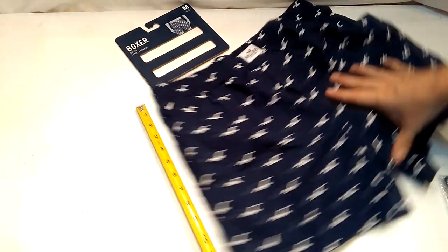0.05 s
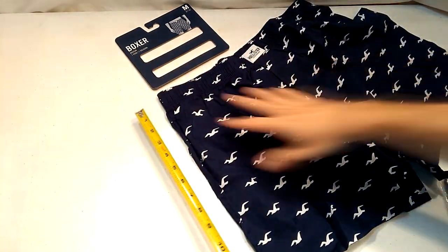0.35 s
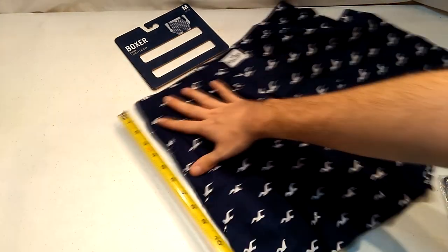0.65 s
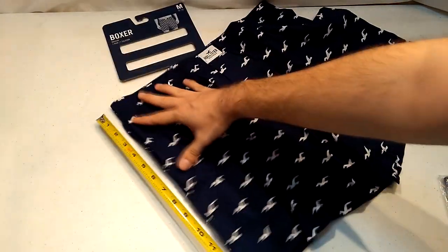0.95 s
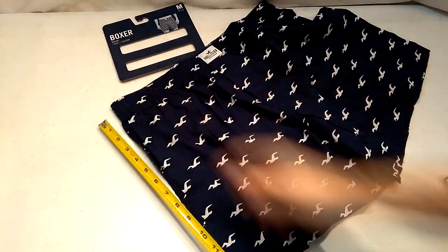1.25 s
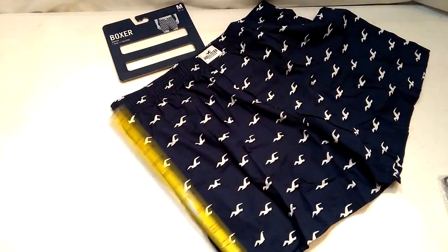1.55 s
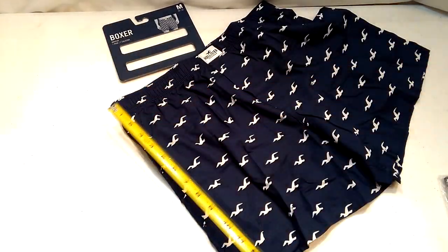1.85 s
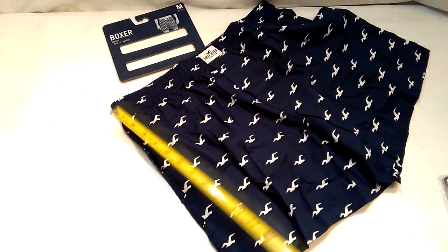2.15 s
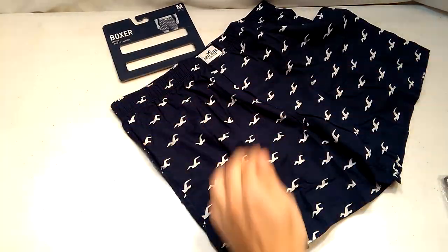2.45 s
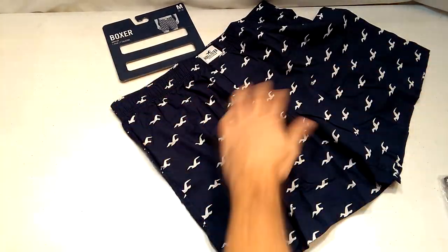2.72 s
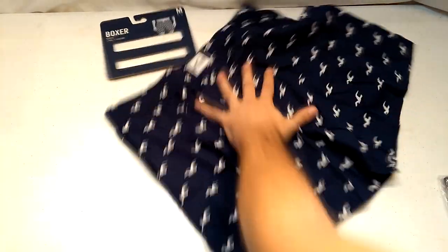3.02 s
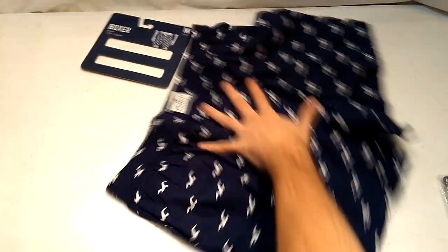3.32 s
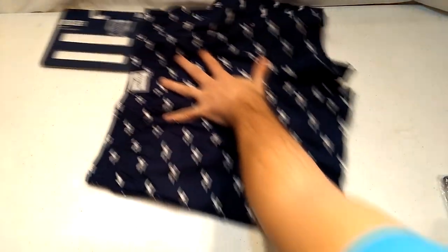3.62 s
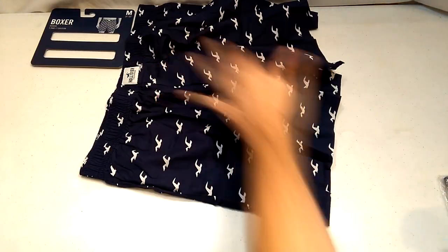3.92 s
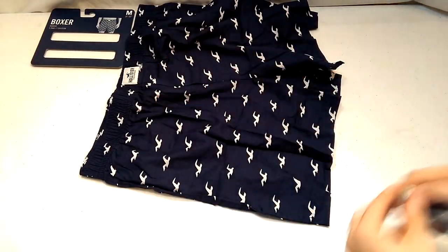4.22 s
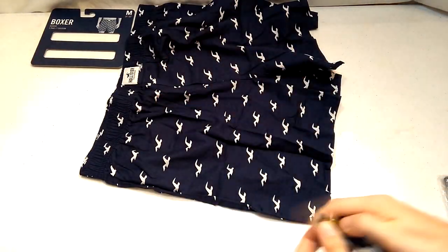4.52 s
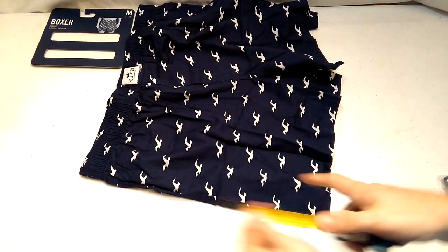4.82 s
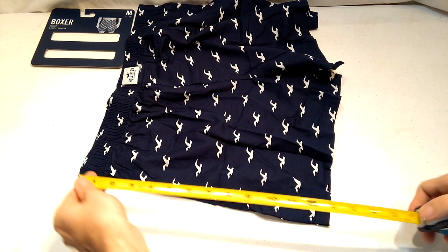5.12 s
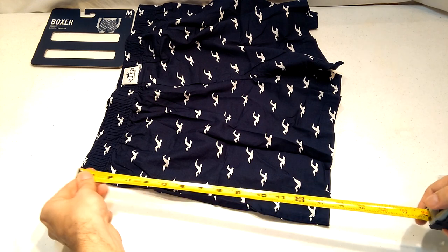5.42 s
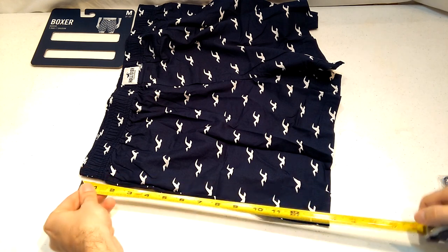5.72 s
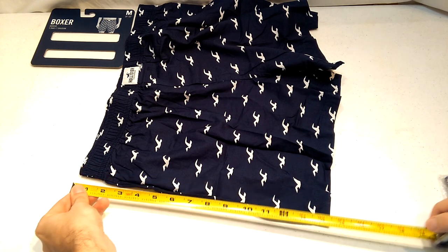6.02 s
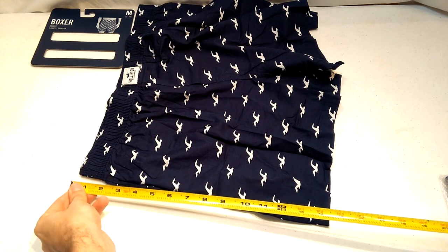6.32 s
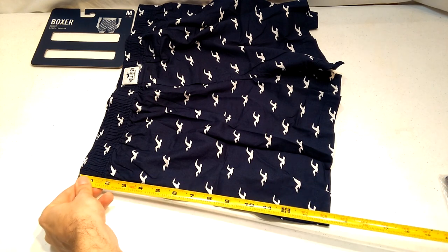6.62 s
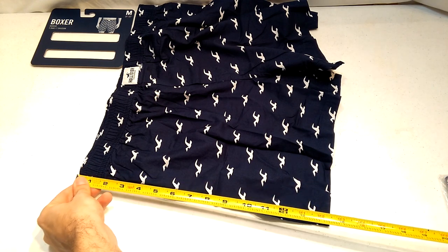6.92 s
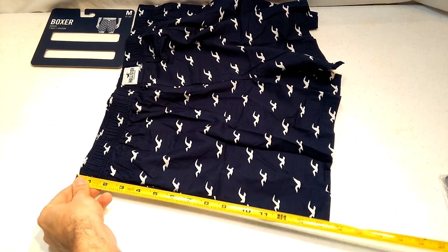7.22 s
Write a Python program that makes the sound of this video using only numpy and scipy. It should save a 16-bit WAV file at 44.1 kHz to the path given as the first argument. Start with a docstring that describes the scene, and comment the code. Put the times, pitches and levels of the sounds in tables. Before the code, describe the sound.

A metal tape measure bounces on a table, retracts with a sharp clack and later snaps twice, amid faint sliding of fabric.

```python
"""Tape measure and cotton shorts on a table

Close to the microphone, in a small, humming room, cotton shorts are smoothed and turned: friction noise.
A steel tape measure scrapes, bounces and slaps down, exciting the modes of blade and table, then whips
back into its case. The lock clicks; the blade is drawn out and snaps twice with a thin metallic ring."""
import sys
import numpy as np
from scipy import signal
from scipy.fft import rfft, irfft
from scipy.io import wavfile
from scipy.ndimage import uniform_filter1d

SR = 44100
rng = np.random.default_rng(int(sys.argv[2]) if len(sys.argv) > 2 else 0)


def output_pcm(signal):
    """Save a mono or channel-first signal as 16-bit PCM at the path in sys.argv[1].

    Samples are clipped to [-1, 1] before scaling.
    """
    pcm = np.clip(np.atleast_2d(signal).T, -1, 1) * 32767
    wavfile.write(sys.argv[1], SR, np.round(pcm).astype(np.int16))


N = 324576
TIME = np.arange(N) / SR
BLOW_TIME, RUB_TIME = TIME[:2 ** 14], TIME[:SR]

# Spectrum of light friction on cloth. Each row, as in every spectrum: frequency in Hz, level in dB.
BRUSH_SPECTRUM = [(350, -42), (600, -7.5), (801, 2.5), (997, -1), (1800, -11.5), (2090, 3), (2310, 0),
                  (3830, -5), (16000, -37.5)]
# Resonances of the blade lying on the table. Each row: centre in Hz, width in Hz, lift in dB.
LYING_BLADE = [(590, 38, 11), (767, 62, 6), (905, 51, 3), (1071, 41, 9), (1340, 180, 4.5), (1744, 35, 9.5),
               (2380, 110, 7.5)]


def blade_impacts():
    """Impact excitation: the blade rocks from edge to edge, slaps down and quivers; the table rings."""
    # Each row: time in seconds, level in dB.
    bounces = [(1.076, -38), (1.156, -27), (1.248, -28), (1.321, -33.5), (1.385, -32), (1.45, -35.5),
               (1.499, -38)]
    # Each row: time in seconds, level in dB, tilt in dB per octave.
    slaps = [(1.9965, -13.5, -0.5), (1.9985, -4.5, 4), (2.0135, -16, -2)]
    # Each row: start, rise and end in seconds, level in dB.
    quivers = [(2.0, .015, 2.09, -45.5)]
    # Spectra of the three motions. Each row: frequency in Hz, level in dB.
    bounce_spectrum = [(150, -35), (250, -9), (373, -5), (414, -8), (586, -2), (640, -14), (890, 5),
                       (988, -4.5), (1100, 1.5), (1580, -7.5), (2360, -8), (4570, -21), (16000, -60)]
    slap_spectrum = [(70, -44), (170, -11), (260, -29), (420, -13), (600, -6), (950, -6.5), (1170, 2.5),
                     (1500, -10), (2400, -8), (4000, -15), (7000, -23.5), (11000, -34.5), (16000, -48)]
    quiver_spectrum = [(40, -14), (90, -6.5), (200, -24), (350, -3), (600, -20.5), (1000, -26),
                       (4000, -47.5)]
    hardest_db = max(db for _, db in bounces)
    edge_hits = []
    for s, db in bounces:
        tilt_db = 2.5 + .47 * (db - hardest_db)  # harder bounces are brighter
        edge_hits.append((s, db, tilt_db))
        edge_hits.append((s + .0195, db - 10.5, tilt_db - 3.5))  # the other edge, softer and duller
    rocking = impacts(edge_hits, bounce_spectrum, LYING_BLADE, crack_t60=.02, ring_db=-2, ring_t60=.058,
                      damping=.27, room_db=-17, right_db=2, lag_s=-.000088)
    slap = impacts(slaps, slap_spectrum, LYING_BLADE, crack_t60=.018, ring_db=-9.5, ring_t60=.071,
                   damping=.03, room_db=-25, right_db=2, lag_s=-.000081)
    quiver = friction(quivers, quiver_spectrum, LYING_BLADE, release_t60=.11, grain_db=11,
                      judder_db=1.5, judder_hz=68, right_db=1.5, lag_s=0)
    table = table_top(slaps[1][0], -27.5, tilt_db=1, pivot_hz=997)
    table += sum(table_top(s, db - 19.5, tilt_db=.5, pivot_hz=997) for s, db in bounces)
    return rocking + slap + quiver + table


def blade_snaps():
    """Buckling: the curved blade snaps straight and rings on, longer when it is held more loosely."""
    # Each row: time in seconds, level in dB, tilt in dB per octave, ring level in dB, ring time factor.
    snaps = [(5.169, -9.5, -1, -12.5, .72), (5.4876, -8.5, 0.5, -8, 1.1)]
    # Each row: frequency in Hz, level in dB.
    spectrum = [(150, -50), (300, -26.5), (580, -10), (900, -13), (1100, -13.5), (1700, -5.5), (2400, 1),
                (3300, -7), (7500, -5.5), (11000, -6.5), (14500, -12), (16000, -25.5)]
    # Resonances of the blade in the air. Each row: centre in Hz, width in Hz, lift in dB.
    free_blade = [(1105, 140, 10), (1430, 90, 3), (2330, 290, 1.5), (2850, 120, -1), (4030, 200, 7.5),
                  (4600, 160, 5.5), (5710, 190, 9), (8000, 100, 4.5), (11100, 230, 4.5)]
    # Each row: frequency in Hz, level in dB, 60 dB decay time in seconds.
    steel_modes = [(1953, -15.8, 0.33), (2295, -21.5, 0.13), (3912, -27.5, .11), (5790, -27, .1),
                   (8045, -29, .1)]
    crash = impacts([row[:3] for row in snaps], spectrum, free_blade, crack_t60=.02, ring_db=-4.5,
                    ring_t60=.1, damping=.01, room_db=-20.5, right_db=3, lag_s=.00025)
    return crash + sum(ringing(s, db, steel_modes, sustain) for s, _, _, db, sustain in snaps)


def case_clicks():
    """Impact excitation: the hook strikes the case, the thumb lock clicks, blade and case tick lightly."""
    # Each row: time in seconds, level in dB, tilt in dB per octave.
    hook_hits = [(2.3817, -20, 0), (2.3853, -5, 0.5), (2.3862, -5.5, -0.5), (2.3925, -25, -2.5),
                 (2.4485, -29, -4.5), (2.4685, -31.5, 0.5)]
    lock_clicks = [(4.47, -25.5, -6), (4.4912, -14.5, -2)]
    touches = [(1.8127, -48.5, -1), (1.9055, -47, -6.5), (1.9379, -43, 2), (1.966, -49, 2),
               (2.136, -33.5, 2), (2.1751, -42.5, 1), (2.2263, -42.5, -4), (5.694, -41.5, 0.5),
               (5.9637, -50.5, -1.5), (6.0568, -49, -1), (6.097, -48, 0), (7.206, -47.5, -1.5),
               (7.2688, -45, -2.5), (7.2864, -44.5, 0)]
    # Spectra of these contacts. Each row: frequency in Hz, level in dB.
    hook_spectrum = [(120, -52.5), (200, -19.5), (432, -12.5), (548, -16.5), (1080, -11.5), (1980, -13.5),
                     (2700, -3), (3310, -6.5), (3900, -6.5), (4520, -8.5), (8270, -14.5), (9400, -25),
                     (11500, -20), (16000, -35)]
    lock_spectrum = [(240, -50.5), (400, -27), (979, -25), (1230, -14.5), (2710, -4), (3120, -5.5),
                     (7170, 0), (9610, -9.5), (12300, -3), (16000, -16)]
    touch_spectrum = [(290, -40), (500, -8.5), (1320, -5), (2330, -6), (2610, -1), (5090, -5.5),
                      (5970, -10.5), (11100, -23), (16000, -23.5)]
    # Each row: centre in Hz, width in Hz, lift in dB.
    case_resonances = [(570, 20, 3.3), (1070, 120, 2.5), (1570, 40, 1.3), (2260, 120, 5.5),
                       (2600, 270, 3.1), (3970, 520, 4.1), (7030, 600, 1)]
    lock_resonances = [(1740, 200, 3), (3700, 310, 6.5), (5330, 93, -14), (7160, 630, 7), (10700, 490, 6.5),
                       (12250, 790, 4.5)]
    # Ring of the case after a click. Each row: frequency in Hz, level in dB, 60 dB decay time in seconds.
    shell_modes = [(2770, -19, .09)]
    hook = impacts(hook_hits, hook_spectrum, case_resonances, crack_t60=.0034, ring_db=-15, ring_t60=.07,
                   damping=.12, room_db=-30, right_db=7, lag_s=.00031)
    lock = impacts(lock_clicks, lock_spectrum, lock_resonances, crack_t60=.012, ring_db=-10.5,
                   ring_t60=.075, damping=.22, room_db=-26, right_db=4.5, lag_s=.00018)
    shell = sum(ringing(s, db, shell_modes) for s, db, _ in lock_clicks)
    ticks = impacts(touches, touch_spectrum, (), crack_t60=.028, ring_db=-6, ring_t60=.073,
                    damping=.11, room_db=-15, right_db=3.5, lag_s=.0001)
    return hook + lock + shell + ticks


def blade_through_mouth():
    """Sliding friction in the case mouth: the spring pulls the blade in; drawn out again, it catches."""
    # Each row: start, rise and end in seconds, level in dB.
    rewinds = [(2.236, 0.13, 2.383, -38.5)]
    draws = [(4.715, 0.13, 5.014, -45.5), (6.195, 0.021, 6.31, -60)]
    # Each row: time in seconds, level in dB, tilt in dB per octave.
    catches = [(4.797, -51.5, -3), (4.84, -44, 2), (4.88, -38, -1.5), (4.982, -36, -0.5)]
    # Each row: frequency in Hz, level in dB.
    rewind_spectrum = [(120, -38.5), (200, -19.5), (254, -15), (401, -2), (473, -12.5), (519, -0.5),
                       (612, -10), (1020, -13.5), (1620, -4.5), (2130, -9), (4120, -8.5), (13100, -19.5),
                       (16000, -21.5)]
    draw_spectrum = [(150, -35.5), (250, -6.5), (319, -10), (452, -18), (576, -2.5), (890, -14),
                     (1040, -12), (1420, -9.5), (1550, -5.5), (2240, -5), (3840, -5.5), (7190, -10),
                     (10000, -13), (16000, -23)]
    # Resonances of the blade in the mouth. Each row: centre in Hz, width in Hz, lift in dB.
    mouth = [(510, 120, 3.5), (1620, 130, 0), (2320, 120, -3), (2730, 280, 4), (3870, 250, 5),
             (5500, 92, -5.5), (6633, 200, 2.5)]
    rewind = friction(rewinds, rewind_spectrum, mouth, release_t60=.025, grain_db=1,
                      judder_db=3.5, judder_hz=510, right_db=5.5, lag_s=.00021)
    draw = friction(draws, draw_spectrum, mouth, release_t60=.73, grain_db=4,
                    judder_db=2, judder_hz=94, right_db=3, lag_s=.0002)
    snags = impacts(catches, draw_spectrum, mouth, crack_t60=.011, ring_db=-4, ring_t60=.022,
                    damping=.072, room_db=-17.5, right_db=-1.5, lag_s=.00007)
    return blade_echoes(rewind + draw) + snags


def blade_echoes(sound, wave_m_per_s=700, return_db=-13):
    """Comb filtering: waves reflected at the hook form resonances that fall as the blade lengthens."""
    # Blade outside the case. Each row: time in seconds, length in metres.
    blade_length = [(2.24, .45), (2.385, .05), (4.72, .05), (5.12, .45), (6.2, .45), (6.36, .6)]
    round_trip_s = 2 * np.interp(TIME, *np.transpose(blade_length)) / wave_m_per_s
    gain = from_db(return_db)
    echoes = sum(gain ** k * np.array([np.interp(TIME - k * round_trip_s, TIME, side) for side in sound])
                 for k in (1, 2, 3))
    return (sound + echoes) * np.sqrt(1 - gain ** 2)


def blade_slides():
    """Sliding friction: the blade's edge scrapes over the table and glides over the cloth's hem."""
    # Each row: start, rise and end in seconds, level in dB.
    scrapes = [(-0.07, 0.088, 0.12, -39.5), (1.455, .04, 1.5, -45.3)]
    glides = [(1.44, 0.037, 1.72, -61.5), (5.68, .06, 5.63, -64)]
    # Each row: frequency in Hz, level in dB.
    scrape_spectrum = [(150, -54), (250, -12), (313, -42), (354, -3), (400, -14), (444, -13), (586, -6),
                       (662, -8), (955, -4), (1310, -4.5), (1850, -13), (2200, -21), (2400, -14.5),
                       (2810, -22.5), (16000, -50.5)]
    # Each row: centre in Hz, width in Hz, lift in dB.
    scrape_resonances = [(928, 68, 12), (1047, 70, 8.7), (1920, 200, 9.2)]
    glide_resonances = [(1950, 220, 11), (3050, 250, 4.7), (3840, 250, 1.6), (4350, 240, 6.2)]
    scrape = friction(scrapes, scrape_spectrum, scrape_resonances, release_t60=.17, grain_db=4,
                      judder_db=-2.5, judder_hz=130, right_db=2, lag_s=0)
    glide = friction(glides, BRUSH_SPECTRUM, glide_resonances, release_t60=3.4, grain_db=4.5,
                     judder_db=1, judder_hz=65, right_db=7, lag_s=0)
    return scrape + glide


def cloth():
    """Soft impact and friction: the palm lands and slides the shorts about; fingers brush over them."""
    # Each row: start, rise and end in seconds, level in dB, tilt in dB per octave.
    pushes = [(0.51, 0.022, 0.74, -54.5, 2.4), (0.72, 0.064, 0.901, -48, 1.36), (2.9, 0.16, 3.175, -48, 2),
              (3.16, 0.27, 3.725, -47, 2.5)]
    # Each row: start, rise and end in seconds, level in dB.
    finger_strokes = [(2.41, 0.0727, 2.56, -59), (7.185, 0.053, 7.295, -57.5)]
    # Each row: time in seconds, level in dB, tilt in dB per octave.
    palm_landings = [(0.521, -35.5, -7), (0.584, -39, -10), (2.941, -35.5, -12), (2.976, -39, -13),
                     (3.334, -30.5, -4.5)]
    # Each row: frequency in Hz, level in dB.
    push_spectrum = [(120, 0.5), (200, -1), (294, -7.5), (353, 1), (416, -12), (590, -6.5), (683, -12.5),
                     (1120, -7.5), (1270, -13), (1480, -13), (6520, -33.5), (14900, -50), (16000, -50)]
    slides = friction(pushes, push_spectrum, resonances=[(1080, 48, 3.8)], release_t60=.35, grain_db=3,
                      judder_db=.5, judder_hz=76, right_db=1.5, lag_s=.00007)
    brushes = friction(finger_strokes, BRUSH_SPECTRUM, (), release_t60=.25, grain_db=6,
                       judder_db=1.5, judder_hz=110, right_db=6.5, lag_s=.00005)
    thuds = sum(table_top(s, db, tilt_db, pivot_hz=81) for s, db, tilt_db in palm_landings)
    return slides + brushes + thuds


def table_top(s, db, tilt_db, pivot_hz):
    """Modal response: a soft touch excites the table's low modes, a hard one its high modes."""
    # Each row: frequency in Hz, level in dB, 60 dB decay time in seconds.
    modes = [(65.2, -3, 0.25), (169.5, -1, 0.24), (208.2, 4, 0.099), (353.3, -13.5, 0.252),
             (584.6, -5, 0.16), (714, -5.5, 0.058), (905, -6, 0.11), (1125, -4, 0.095),
             (1340, -17.5, 0.047)]
    tilted = [(hz, mode_db + tilt_db * np.log2(hz / pivot_hz), t60) for hz, mode_db, t60 in modes]
    return ringing(s, db, tilted)


def room_tone():
    """Background noise: broadband ventilation rumble and a hum modulated in amplitude and phase."""
    # Each row: frequency in Hz, level in dB.
    air_spectrum = [(15, -37.5), (25, -18.5), (48, -6), (64, -6), (92, -12), (123, -10), (145, -15),
                    (175, -14.5), (212, -20.5), (301, -22.5), (416, -24.5), (659, -28), (1130, -31.5),
                    (1440, -31.5), (3500, -37), (7000, -47.5), (16000, -53.5)]
    hum_partials = [(54, -60), (120, -58)]
    sound = from_db(-53) * colour(stereo(rng.standard_normal((2, N))), air_spectrum)
    for hz, db in hum_partials:
        amplitude = np.sqrt(2) * from_db(db + drift(5.7))
        sound += amplitude * np.sin(2 * np.pi * hz * TIME + .36 * drift(5.1))
    return sound


def impacts(rows, spectrum, resonances, crack_t60, ring_db, ring_t60, damping, room_db, right_db, lag_s):
    """Impulse response: the contact's crack gives way to the body's dense ring and the diffuse room."""
    out = np.zeros((2, N))
    fade = from_db(-60 * BLOW_TIME / crack_t60)
    room = from_db(room_db) * dense_modes(t60=.22, damping=.09) * (1 - fade)
    for s, db, tilt_db in rows:
        ring = from_db(ring_db) * dense_modes(ring_t60, damping) * (1 - fade)
        direct = colour(contact(fade, lag_s) + ring, spectrum, resonances, tilt_db, right_db)
        sound = direct + colour(room, spectrum, (), tilt_db)
        add(out, s, from_db(db) * sound * (BLOW_TIME < .32))
    return out


def contact(fade, lag_s):
    """Broadband excitation: a dying burst with a flattened spectrum, delayed on the left by lag_s."""
    spectrum = rfft(rng.choice([-1, 1], len(fade)) * fade)
    ripple = np.sqrt(uniform_filter1d(np.abs(spectrum) ** 2, size=60) + 1e-9)
    burst = irfft(spectrum / minimum_phase(unit_rms(ripple)))
    return np.array([np.interp(BLOW_TIME - lag_s, BLOW_TIME, burst, left=0), burst])


def dense_modes(t60, damping):
    """Modal overlap: close modes decay as noise, in t60 seconds at 2 kHz and sooner in higher octaves."""
    noise = rfft(stereo(rng.standard_normal((2, len(BLOW_TIME)))))
    octave = np.clip(np.round(np.log2(bin_hz(len(BLOW_TIME)) / 2000)), -3, 3)
    return sum(irfft(noise * (octave == k)) * from_db(-60 * BLOW_TIME / t60 * 2 ** (k * damping))
               for k in np.unique(octave))


def friction(rows, spectrum, resonances, release_t60, grain_db, judder_db, judder_hz, right_db, lag_s):
    """Stick-slip friction: countless tiny slips of uneven size, bunched by the judder of the stroke."""
    out, size = np.zeros((2, N)), len(RUB_TIME)
    for start, rise_s, end, db, *tilt_db in rows:
        onset = max(start, 0)
        t = onset + RUB_TIME
        # Loudness follows sliding speed: it gathers evenly, holds, and dies away after the end.
        rise = np.clip((t - start) / max(rise_s, .002), 0, 1)
        release = from_db(-60 * np.maximum(t - end, 0) / release_t60)
        judder = np.interp(RUB_TIME * judder_hz, np.arange(999), rng.standard_normal(999))
        noise = rng.standard_normal((2, size))
        slip_sizes = from_db(grain_db * np.minimum(rng.exponential(1, size), 4))
        slips = stereo(unit_rms(noise * slip_sizes), lag_s)
        stroke = slips * from_db(db + judder_db * judder) * rise * release
        add(out, onset, colour(stroke, spectrum, resonances, sum(tilt_db), right_db))
    return out


def ringing(s, db, modes, sustain=1):
    """Free vibration: each mode is a damped sinusoid starting at s seconds."""
    sound, out = 0, np.zeros((2, N))
    for hz, mode_db, t60 in modes:
        phase = np.array([[0], [min(hz / 1200, 1.5)]])  # high modes differ more between left and right
        decay = from_db(db + mode_db - 60 * BLOW_TIME / (t60 * sustain))
        sound = sound + decay * np.sin(2 * np.pi * hz * BLOW_TIME + phase)
    attack = np.minimum(BLOW_TIME * modes[0][0], 1)  # one cycle of the first mode
    add(out, s, sound * attack)
    return out


def colour(x, spectrum, resonances=(), tilt_db=0, right_db=0):
    """Source-filter model: a unit-power filter, then shading that favours the right by right_db at 4 kHz."""
    hz = bin_hz(x.shape[-1])
    db = at_hz(spectrum, hz) + tilt_db * np.log2(np.maximum(hz, 100))
    for centre, width, lift in resonances:
        db = db + lift / (1 + (2 * (hz - centre) / width) ** 2)
    shade = from_db(right_db / 2 * np.sqrt(hz / 4000) * [[-1], [1]])
    return irfft(rfft(x) * minimum_phase(unit_rms(from_db(db))) * shade)


def stereo(pair, lag_s=0):
    """Spatial coherence: two independent noises become alike in the bass; the left lags by lag_s."""
    # Each row: frequency in Hz, left-right correlation from 0 to 1.
    coherence = [(50, 0.74), (150, 0.71), (400, 0.42), (1000, 0.13), (3000, 0.16), (12000, 0.033)]
    hz = bin_hz(pair.shape[-1])
    alike = at_hz(coherence, hz)
    mid, side = rfft(pair)
    channels = (np.sqrt(1 + alike) * mid + np.sqrt(1 - alike) * side * [[1], [-1]]) / np.sqrt(2)
    delay = np.exp(-2j * np.pi * hz * lag_s * np.array([[1], [0]]))
    return irfft(channels * delay, pair.shape[-1])


def minimum_phase(gain):
    """Causality: folding the cepstrum gives a filter that sounds nothing before its input."""
    cepstrum = irfft(np.log(gain))
    half = len(cepstrum) // 2
    cepstrum[1:half] *= 2
    cepstrum[half + 1:] = 0
    return np.exp(rfft(cepstrum))


def drift(rate_hz):
    """Slow random modulation of unit rms."""
    return unit_rms(np.interp(TIME * rate_hz, np.arange(N), rng.standard_normal(N)))


def from_db(db):
    """Decibels to amplitude ratio."""
    return 10 ** (np.asarray(db) / 20)


def unit_rms(x):
    """Normalisation to unit power."""
    return x / np.sqrt(np.mean(x ** 2) + 1e-20)


def at_hz(points, hz):
    """Interpolation on a log-frequency axis."""
    frequencies, values = np.transpose(points)
    return np.interp(np.log(hz), np.log(frequencies), values)


def bin_hz(size):
    """Fourier bin frequencies, kept above zero."""
    return np.maximum(np.fft.rfftfreq(size, 1 / SR), 1)


def add(out, s, sound):
    """Superposition of a sound at s seconds."""
    at = max(round(s * SR), 0)
    out[:, at:at + sound.shape[-1]] += sound[:, :N - at]


def scene():
    """Superposition: the cloth, the tape measure and the room add linearly."""
    return (cloth() + blade_slides() + blade_impacts() + blade_through_mouth() + case_clicks()
            + blade_snaps() + room_tone())


def record(dry):
    """Band limiting and saturation: the microphone drops deep bass, rounds peaks and cuts the top."""
    low_hz, high_hz, ceiling = 40, 16000, .88
    sound = signal.sosfilt(signal.butter(4, low_hz, "high", fs=SR, output="sos"), dry)
    rounded = ceiling * np.tanh(sound / ceiling)
    return signal.sosfilt(signal.ellip(10, .1, 80, high_hz, fs=SR, output="sos"), rounded)


dry = scene()
out = record(dry)
output_pcm(out)
```